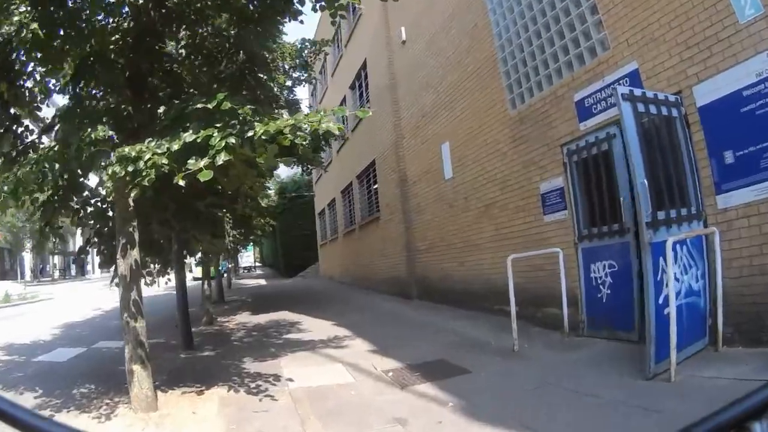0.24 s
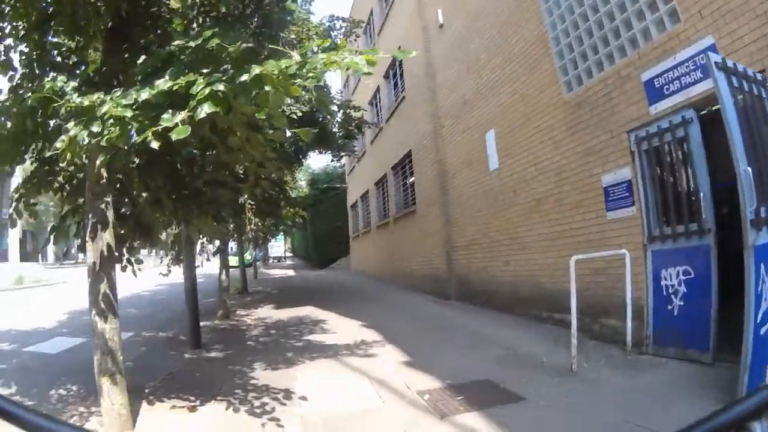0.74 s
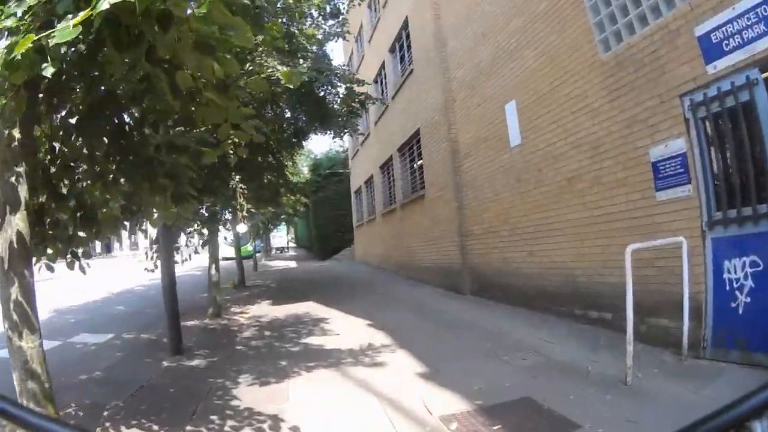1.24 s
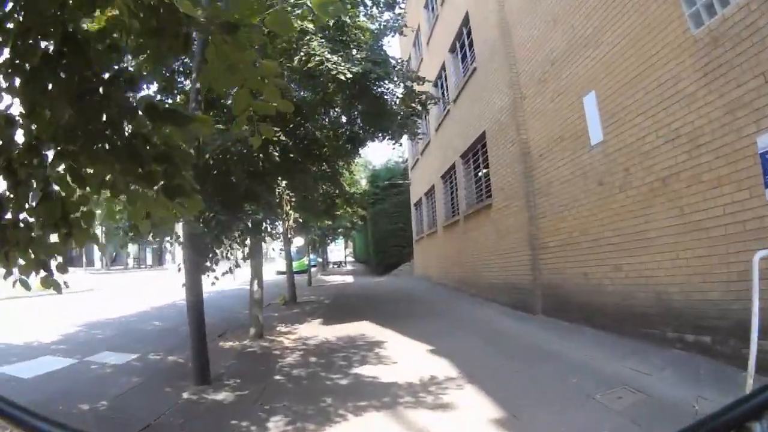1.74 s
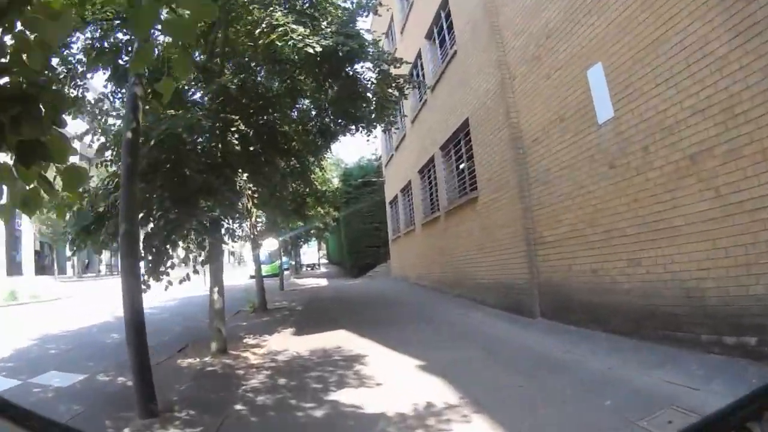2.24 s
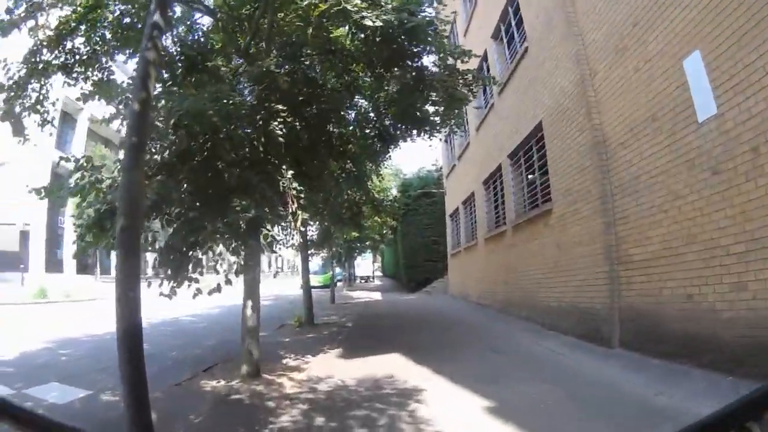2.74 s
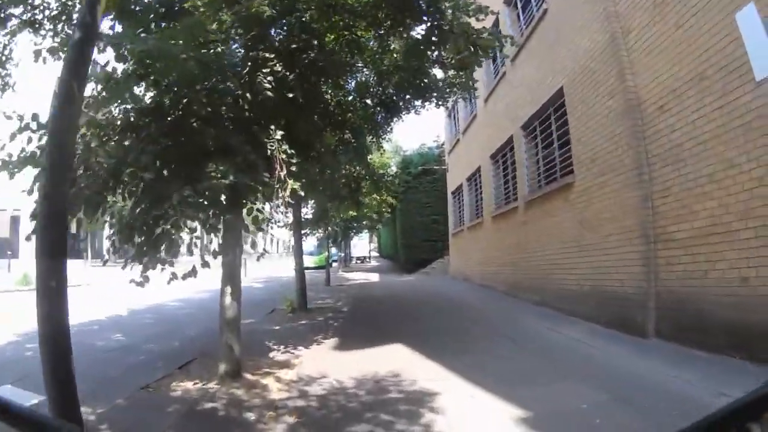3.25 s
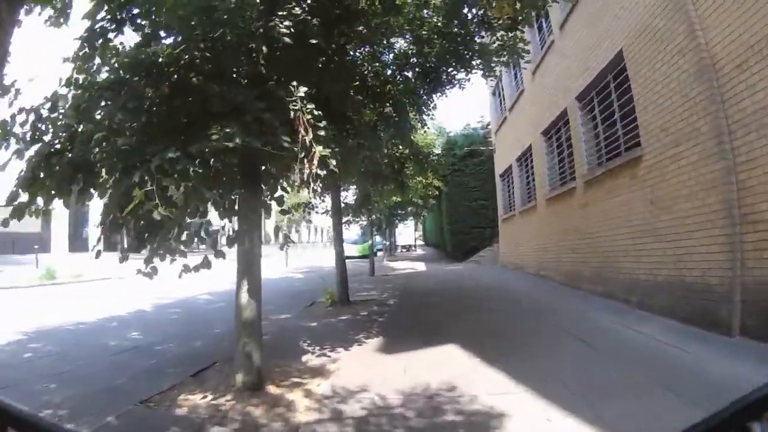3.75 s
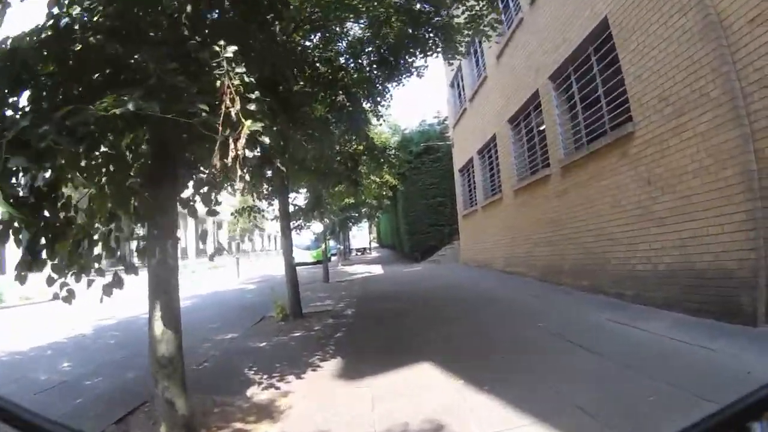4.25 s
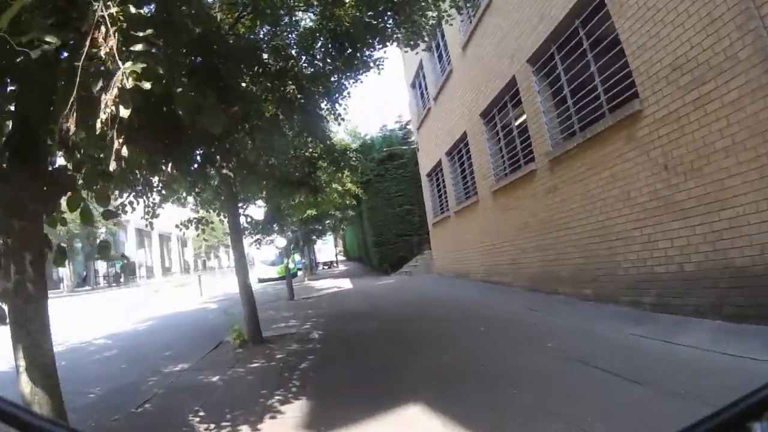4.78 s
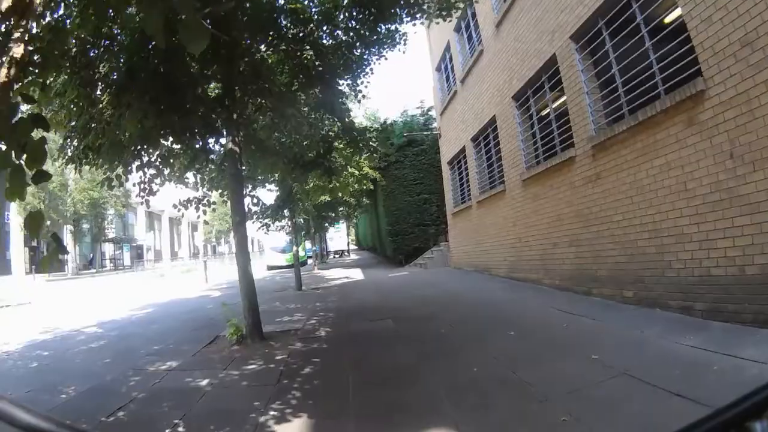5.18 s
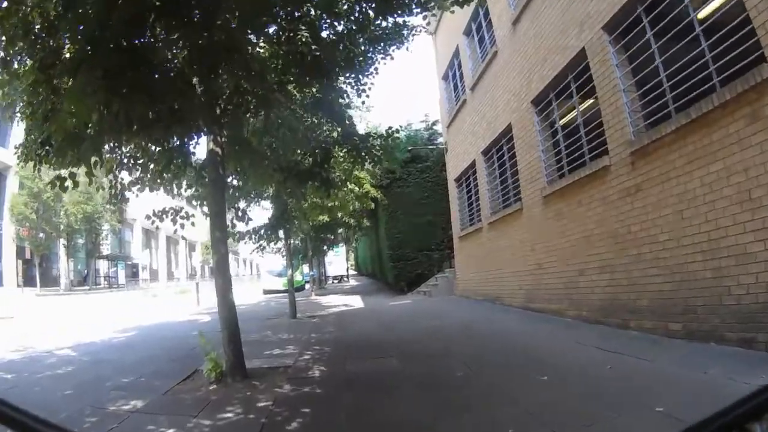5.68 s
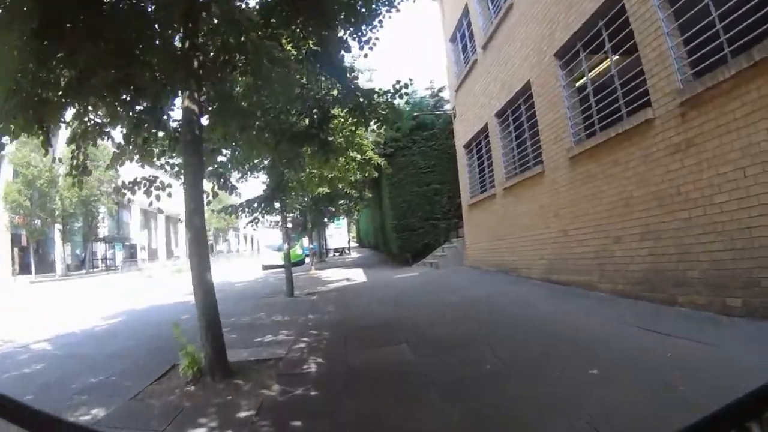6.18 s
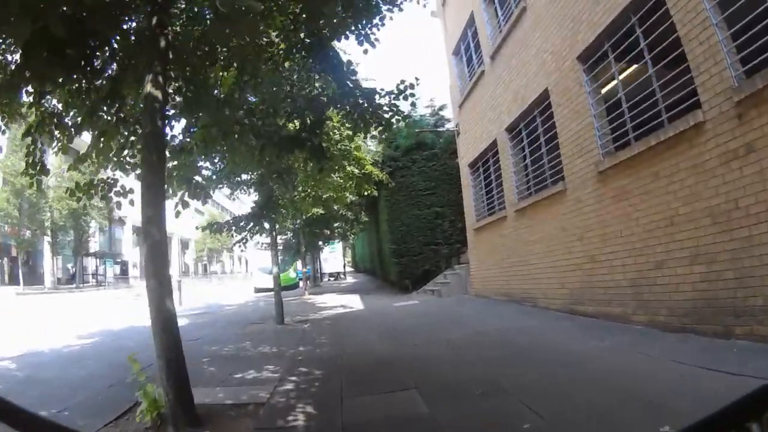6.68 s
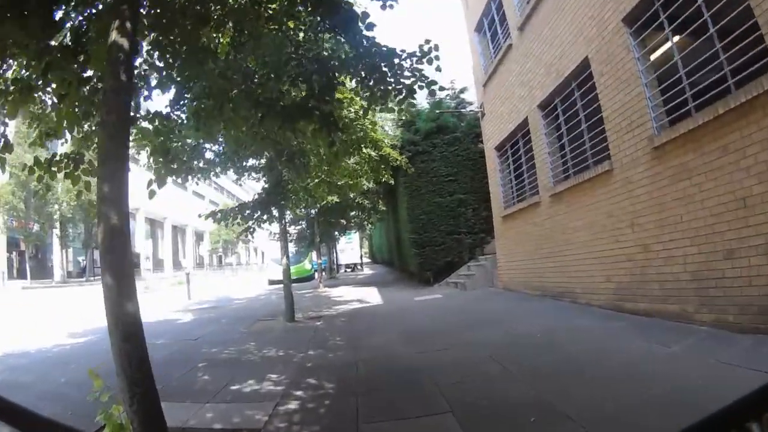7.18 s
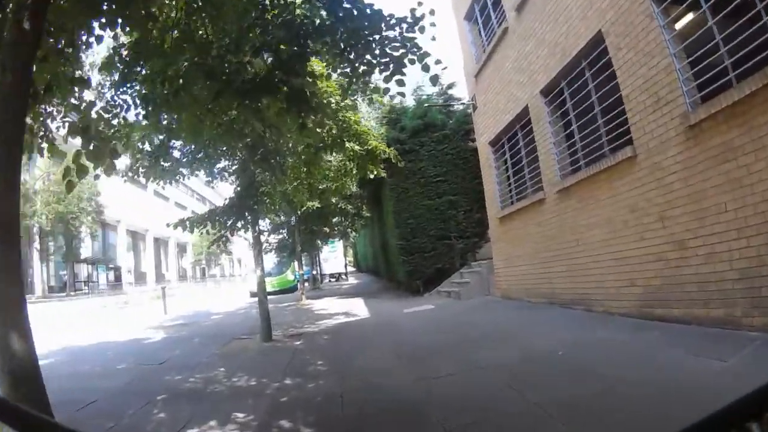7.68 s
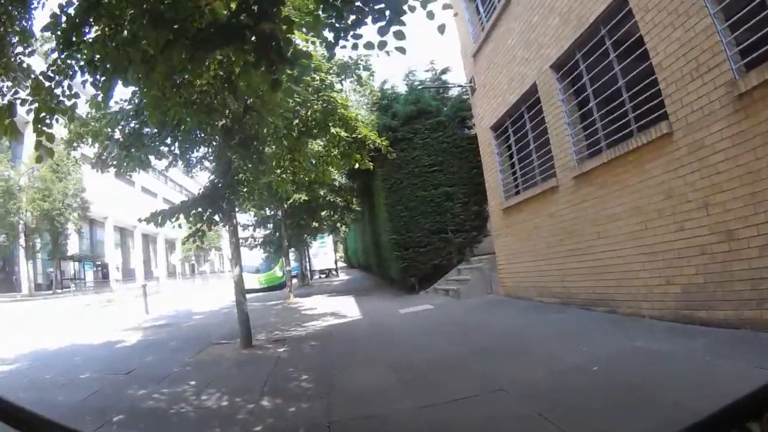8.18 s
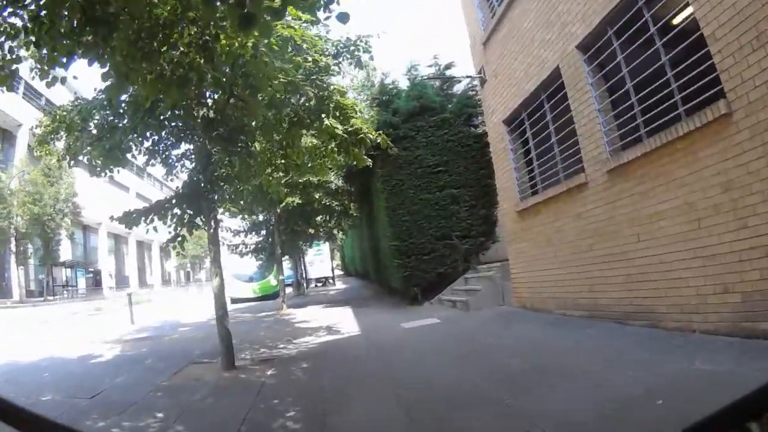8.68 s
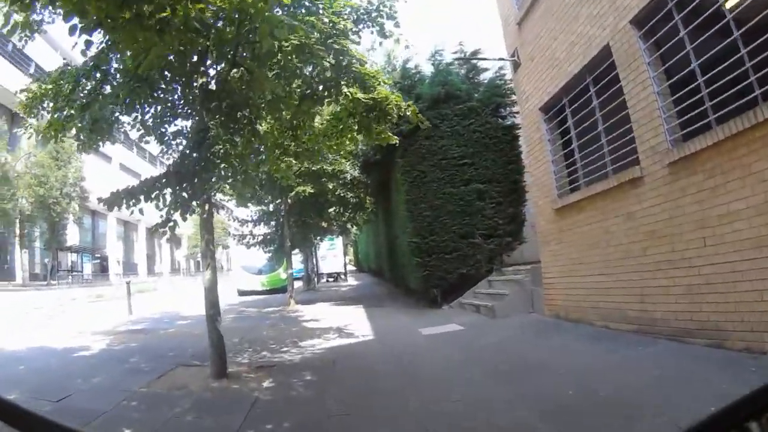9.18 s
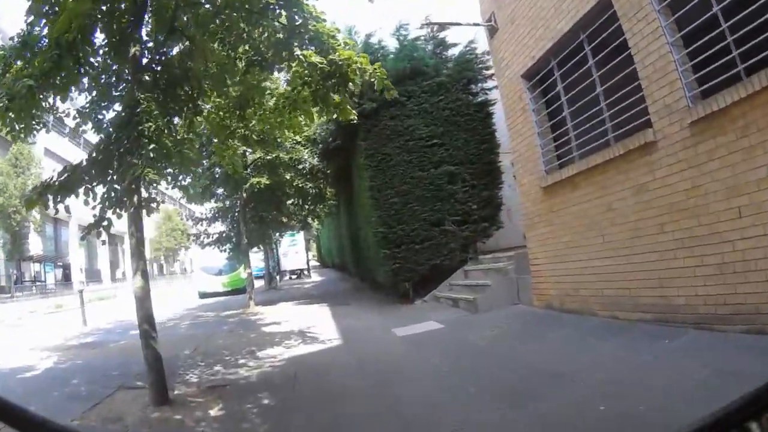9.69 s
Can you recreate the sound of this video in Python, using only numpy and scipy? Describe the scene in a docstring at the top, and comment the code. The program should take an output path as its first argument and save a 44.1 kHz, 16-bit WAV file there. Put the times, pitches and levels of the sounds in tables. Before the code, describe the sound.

A microphone inside a camera housing on a bicycle rides over paving slabs. Throughout, there is a low, uneven tyre rumble, fine loose ticking and a soft distant traffic hiss. Light taps start at once; from 0.57 s hard, hollow plastic knocks crowd together until about 1.5 s, the one near 0.8 s very loud with a deep frame thump. A calmer stretch follows, then another cluster at 2.5-3.0 s, with a barely audible rising whine at 3-3.5 s. Separate clacks fall around 3.8 and 4.1 s. From 5.2 to 6.3 s knocks come thickly, chattering and rasping, with low thumps near 5.5 s and slightly rougher rumble. More strong hits land near 7.3, 7.55, 8.4 and 9.4 s, with fainter taps between. Brief gritty tyre scuffs come at 6.9 and 7.8 s. After 8.3 s a soft low engine hum swells and holds to the end. Everything is close and dry, with very short tails.

```python
"""A camera on a bicycle rolls over paving slabs along a quiet street. From the start: tyre rumble with small
rattles, traffic hiss, and knocks from faint to fairly strong. Slab joints knock the plastic mount, which
chatters, rasps and rings; deep ruts thump the frame. A faint whine rises near 3 s, tyres scuff grit near 6.9
and 7.8 s, and an engine hum swells in after 8.3 s. Knocks are shaped impulses with swarms of contacts; the rest
is filtered noise and sine tones."""
import sys
import numpy as np
from scipy import signal
from scipy.fft import rfft, irfft
from scipy.io import wavfile
from scipy.ndimage import uniform_filter1d

SR = 44100
rng = np.random.default_rng(int(sys.argv[2]) if len(sys.argv) > 2 else 0)


def transcribe(u):
    """Save the signal u as a 16-bit wav file named by the first command-line argument.

    u: samples, shape (n,) or (channels, n), limited to [-1, 1]; the rate is SR.
    q: integer samples, one column per channel.
    """
    v = np.clip(np.atleast_2d(u).T, -1, 1)
    q = np.round(v * 32767).astype(np.int16)
    wavfile.write(sys.argv[1], SR, q)


N = 437913
TIME = np.arange(N) / SR

# Engine hum swelling in: start_s, level_db (rms)
HUM_LEVELS = [(8.3, -59), (8.8, -42.5), (9.9, -42.5)]
# Faint rising whine: start_s, pitch_hz, level_db (rms, before flutter)
WHINE_PATH = [(2.95, 2440, -69), (3.29, 2565, -66), (3.55, 2700, -78)]
# Colour of tyres and street: frequency_hz, level_db (per Hz, relative)
STREET_SPECTRUM = [(22, -11.5), (62, 5.5), (160, 2.5), (260, -5), (580, -3), (780, -12), (1450, -23),
                   (1780, -23.5), (2250, -26.5), (2550, -33.5), (3050, -34.5), (3750, -40), (4700, -41.5),
                   (5400, -44), (7800, -49.5)]
# The ride over changing ground: start_s, rumble_db, traffic_hiss_db (before trims and wavering)
RIDE_LEVELS = [(0, -39, -58.5), (1.25, -38, -61.5), (1.42, -35, -51.5), (1.8, -42, -63), (2.6, -37.5, -58),
               (5.103, -38, -55.5), (5.549, -34, -52.5), (7.101, -37.5, -55.5), (9.901, -36, -56.5)]
# Tyre scuffs on grit: start_s, length_s, level_db (of the rasp), centre_hz
TYRE_SCUFFS = [(6.892, 0.046, -42, 1590), (7.778, 0.095, -39, 940)]
# Thumps of the flexing frame: start_s, level_db (nominal peak)
FRAME_THUMPS = [(0.807, -20), (2.615, -24), (2.943, -18), (4.536, -22), (5.205, -21), (5.491, -14),
                (5.55, -19), (7.628, -21)]
# The housing's answer to one clean blow: frequency_hz, level_db (relative)
BLOW_SPECTRUM = [(25, -32), (60, -18), (200, -0.5), (450, 5.5), (640, 7.5), (850, -5.5), (1150, -6.5),
                 (1450, -20.5), (1750, -25), (2300, -31), (7500, -41.5)]
# The housing when it chatters loosely: frequency_hz, level_db (relative)
CHATTER_SPECTRUM = [(25, -28), (70, -14.5), (200, -3.5), (270, -3.5), (360, 5.5), (470, -4), (630, -1),
                    (900, -13), (1500, -29), (3000, -43), (7500, -71)]
# Thin plastic parts that rasp at each contact: frequency_hz, level_db (relative)
RASP_SPECTRUM = [(500, -14.5), (1200, -15), (1800, 8), (2250, 0.5), (2850, 3.5), (3300, -8), (3900, -8.5),
                 (7500, -13)]
# Ringing of the hollow casing and its metal fittings: pitch_hz (before detuning),
# level_db (relative to the knock, before looseness and chance), t60_s
CASING_RINGS = [(362.6, -15.5, .06), (595, -13, 0.042), (1640, -38.5, 0.041)]
# Knocks at the slab joints: start_s, level_db (nominal peak), chatter_db (relative to the knock, before trim),
# crack_db (extra rasp of the plastic)
JOINT_KNOCKS = [(.57, -6.5, -17, -2.5), (.601, -8.5, -8.5, 4), (0.6404, -15, -15, 13.5),
                (0.7825, 2, -16.5, -3.5), (0.79, -11, -4.5, 2.5), (.817, -6.5, -9, -15),
                (.878, -12, -15, 5), (0.954, -11.5, -19, -11), (0.9851, -8, -24, 8.5),
                (1.161, -17.5, -18, 13.5), (1.2041, -19.5, -10.5, 6), (1.3269, -5, -20, -9),
                (1.3926, -6, -5.5, 3), (1.4345, -0.5, -18.5, 3.5), (1.509, -19, -7.5, 4.5),
                (1.735, -17.5, -6, -1), (2.474, -9.5, -21, 0), (2.622, -8, -24, 5), (2.731, -9.5, -33, 13),
                (2.929, 0.5, -30, -1), (2.9525, -4.5, -8.5, -2), (2.984, -14.5, -9, 8),
                (3.286, -15, -24, 14), (3.601, -15.5, -15, 13.5), (3.81, -1.5, -17.5, -11),
                (4.0775, -6.5, -30, -1), (4.4844, -17.5, -11.5, 4), (5.2177, -5, -8, 1.5),
                (5.2726, -6, -26, -4), (5.3104, -6, -16, 7), (5.4083, -19, -0.5, -5),
                (5.4797, -4.5, -12, -1), (5.5437, -4, -8, 4.5), (5.585, -12.5, -26, 14.5),
                (5.7518, -11, -4.5, -6), (5.773, -13.5, -14.5, 11), (5.873, -13.5, -15.5, 9),
                (6.1147, -1, -31, 0), (6.16, -5.5, -12, 2), (6.178, -10.5, -11, 7), (6.2272, 2, -24, -2),
                (6.2742, -8, -11, 0.5), (6.518, -10, -6.5, 2), (6.811, -10.5, -15, -5),
                (6.8438, -10.5, -10, 2), (6.984, -15, -4, -3), (7.3047, -3, -29.5, 3.5),
                (7.5496, 0, -27, 1), (7.582, -17.5, -4, 7), (7.6966, -4, -14, 0), (7.715, -13, -8.5, 1),
                (8.317, -7, -13, 6.5), (8.4129, -2, -23, -8), (8.4729, -12.5, -13, 3),
                (9.0665, -14, -9, -1), (9.4222, -0.5, -28.5, 5), (9.5795, -15.5, -1.5, 7),
                (9.7813, -5.5, -22.5, 0.5)]
# Further knocks, from faint to fairly strong, with a common chatter, crack and pitch: start_s, level_db
# (nominal peak)
FURTHER_KNOCKS = [(.052, -11.5), (.118, -16), (.353, -15.5), (.552, -16), (.61, -17.5), (.849, -14.5),
                  (1.1292, -11), (1.384, -15), (1.452, -17), (1.773, -12), (1.795, -19), (1.9, -20),
                  (2.301, -19.5), (2.519, -15), (2.547, -17), (2.609, -13.5), (2.665, -15.5), (2.758, -15),
                  (2.824, -18.5), (2.86, -16), (3.013, -17), (3.047, -16.5), (3.0633, -13.5), (3.223, -10),
                  (3.2727, -13.5), (3.443, -21), (3.469, -20.5), (3.783, -19.5), (3.835, -12), (3.845, -9.5),
                  (4.051, -15), (4.3842, -12.5), (4.416, -16.5), (5.0223, -15), (5.2, -14), (5.332, -18),
                  (5.496, -11), (5.529, -12), (5.605, -20.5), (5.6843, -10), (5.952, -19), (6.025, -18.5),
                  (6.09, -12), (6.102, -8.5), (6.15, -16), (6.414, -17.5), (6.455, -19), (6.623, -16),
                  (6.873, -15.5), (6.962, -20.5), (7.384, -17.5), (7.492, -21), (7.888, -18), (7.961, -18),
                  (8.02, -17), (8.096, -17), (8.448, -18), (8.6825, -10.5), (8.757, -20), (8.791, -14),
                  (8.958, -17.5), (9.169, -17.5), (9.485, -18.5), (9.566, -16.5), (9.699, -18), (9.752, -15),
                  (9.829, -14), (9.847, -17.5)]

# a firm joint knock rings higher than a loose one; a louder one rings slightly lower
BASE_HZ, FALL_HZ_PER_CHATTER_DB, FALL_HZ_PER_LEVEL_DB = 453, 6.5, 1
# harder blows are brighter: treble dB gained per dB of level, above a corner
TREBLE_DB_PER_DB, TREBLE_HZ = 0.82, 1170
# the further knocks share one middling chatter, crack and nominal pitch
COMMON_CHATTER_DB, COMMON_CRACK_DB, COMMON_HZ = -14.5, 3, 575
EDGE_HZ = 8250  # upper band limit of the microphone's input


def gain_of(db):
    """Decibels to amplitude."""
    return 10 ** (np.asarray(db) / 20)


def evened(x):
    """Scales a sound to rms 1."""
    return x / np.sqrt(np.mean(x ** 2) + 1e-20)


def read_spectrum(points, hz):
    """A spectrum's dB, joined on a log-frequency axis."""
    f, db = np.transpose(points)
    return np.interp(np.log(hz + 1), np.log(f + 1), db)


def add(mix, start_s, sound):
    """Mixes a sound in at its start time."""
    part = mix[max(round(start_s * SR), 0):][:len(sound)]
    part += sound[:len(part)]


def decay(t, t60):
    """Exponential fade that falls 60 dB in t60 seconds."""
    return np.exp(-np.log(1000) * t / t60)


def body_response(points, stretch=1, treble_db=0, size=2048):
    """Minimum-phase answer of a body with this spectrum, peak 1; stretch raises its pitch."""
    hz = abs(np.fft.fftfreq(size, 1 / SR))
    treble_shelf = treble_db / (1 + (TREBLE_HZ / (hz + 1)) ** 4)
    log_gain = np.log(gain_of(read_spectrum(points, hz / stretch) + treble_shelf))
    # the Hilbert transform gives the phase that puts the energy right at the strike
    wave = np.fft.ifft(np.exp(signal.hilbert(log_gain).conj())).real[:size // 2]
    return wave / abs(wave).max()


def drift(hz):
    """Slow random wandering of rms 1, holding only frequencies below hz."""
    spectrum = rfft(rng.standard_normal(N))
    return evened(irfft(spectrum * (np.fft.rfftfreq(N, 1 / SR) < hz), N))


def band(x, low_hz, high_hz):
    """Butterworth band-pass."""
    return signal.sosfilt(signal.butter(2, [low_hz, high_hz], "band", fs=SR, output="sos"), x)


def patchy(x, db=2.0, width_hz=260, length_s=.09):
    """Lets a hiss drift in soft patches of pitch and time, at rms 1."""
    hz, s, z = signal.stft(x, SR, nperseg=1024)
    field = uniform_filter1d(rng.standard_normal(z.shape), int(width_hz / hz[1]) + 1, axis=0)
    field = uniform_filter1d(field, int(length_s / s[1]) + 1, axis=1)
    _, patched = signal.istft(z * gain_of(db * evened(field)), SR, nperseg=1024)
    return evened(patched[:N])


def engine_hum(hum_hz=140, waver=0.02):
    """An engine hums down the street: a sine whose pitch wanders slowly."""
    level = gain_of(np.interp(TIME, *np.transpose(HUM_LEVELS), left=-np.inf))
    turns = np.cumsum(hum_hz * (1 + waver * drift(3.0))) / SR
    return np.sqrt(2) * level * np.sin(2 * np.pi * turns)


def whine(flutter=.35, wobble_hz=24):
    """A brief rising sine, uneven in both level and pitch."""
    s, hz, db = np.transpose(WHINE_PATH)
    level = gain_of(np.interp(TIME, s, db, left=-np.inf, right=-np.inf)) * (1 + flutter * drift(42))
    turns = np.cumsum(np.interp(TIME, s, hz) + wobble_hz * drift(25)) / SR
    return np.sqrt(2) * level * np.sin(2 * np.pi * turns)


def rattle(calm_per_s=22, shaken_per_s=55, shaken_s=0.1, spread_db=3.5, length_s=0.0024, rasp_db=-22):
    """The mount ticks now and then, busily after each joint; each tick is a tiny cluster of contacts."""
    since_joint = np.min([np.where(TIME > s, TIME - s, np.inf) for s, *_ in JOINT_KNOCKS], axis=0)
    per_s = calm_per_s + shaken_per_s * np.exp(-since_joint / shaken_s)
    strength = gain_of(spread_db * np.minimum(rng.exponential(1, N), 2))
    ticks = (rng.random(N) < per_s / SR) * strength
    clusters = signal.oaconvolve(ticks, signal.windows.hann(int(length_s * SR)))[:N]
    contacts = clusters * rng.standard_normal(N)
    body = evened(signal.oaconvolve(contacts, body_response(CHATTER_SPECTRUM))[:N])
    rasp = evened(signal.oaconvolve(contacts, body_response(RASP_SPECTRUM))[:N])
    return body + gain_of(rasp_db) * rasp


def rolling(rumble_db=0.5, hiss_db=0, rattle_db=-3.0, lumpy_db=2.0, hiss_waver_db=2.0):
    """Tyre rumble and rattle follow the roughness of the ground; street hiss lies behind them."""
    s, ground_db, traffic_db = np.transpose(RIDE_LEVELS)
    hz = np.fft.rfftfreq(N, 1 / SR)
    street = rfft(rng.standard_normal(N)) * gain_of(read_spectrum(STREET_SPECTRUM, hz))
    far = 1 / (1 + (1200 / (hz + 1)) ** 4)  # the treble is mostly distant traffic
    hiss_level = gain_of(np.interp(TIME, s, traffic_db) + hiss_db + hiss_waver_db * drift(42))
    traffic = hiss_level * patchy(irfft(street * far, N))
    rumble = gain_of(rumble_db + lumpy_db * drift(25)) * evened(irfft(street * (1 - far), N))
    near = rumble + gain_of(rattle_db) * rattle()
    return gain_of(np.interp(TIME, s, ground_db)) * near + traffic


def scuffs(fizz_db=-22, grains_per_s=2400):
    """Rubber drags over grit: dense grains rasp an octave either side of the centre, with a little fizz."""
    out = np.zeros(N)
    for start_s, length_s, db, hz in TYRE_SCUFFS:
        count = int(length_s * SR)
        grit = rng.standard_normal(count) * (rng.random(count) < grains_per_s / SR)
        rasp = evened(band(band(grit, hz / 2, hz * 2), hz / 2, hz * 2))
        fizz = evened(band(rng.standard_normal(count), 2500, 5500))
        scuff = (rasp + gain_of(fizz_db) * fizz) * signal.windows.tukey(count, .5)
        add(out, start_s, gain_of(db) * scuff)
    return out


def thumps(hz=85, t60=0.037):
    """The frame flexes for a few slow cycles: a low sine that dies away fast."""
    out, t = np.zeros(N), np.arange(SR // 10) / SR
    for start_s, db in FRAME_THUMPS:
        add(out, start_s, 2 * gain_of(db) * np.sin(2 * np.pi * hz * t) * decay(t, t60))
    return out


def spray(blows, db=-31, settle_s=0.01, contacts_per_s=700, low_hz=2450, high_hz=3600):
    """After a knock the small parts buzz on, most when loose: a rough, bright spray that thins out."""
    envelope, t = np.zeros(N), np.arange(SR // 4) / SR
    for start_s, knock_db, loose_db, *_ in blows:
        add(envelope, start_s, gain_of(knock_db + loose_db + db) * np.exp(-t / settle_s))
    contacts = evened(rng.standard_normal(N) * (rng.random(N) < contacts_per_s / SR))
    return band(envelope * contacts, low_hz, high_hz) / band(contacts, low_hz, high_hz).std()


def pings(blows, detune=0.045, spread_db=2.0, db_per_chatter_db=0.45):
    """Each knock sets casing and fittings ringing, in a new mix each time; loose knocks ring most."""
    out, t = np.zeros(N), np.arange(SR // 16) / SR
    for start_s, knock_db, loose_db, *_ in blows:
        for ring_hz, ring_db, t60 in CASING_RINGS:
            hz = ring_hz * (1 + detune * rng.standard_normal())
            db = knock_db + db_per_chatter_db * loose_db + ring_db + spread_db * rng.standard_normal()
            add(out, start_s, -gain_of(db) * np.sin(2 * np.pi * hz * t) * decay(t, t60))
    return out


def further_knocks():
    """Further knocks, differing in level only: start_s, level_db, chatter_db, crack_db, pitch_hz."""
    return [(s, db, COMMON_CHATTER_DB, COMMON_CRACK_DB, COMMON_HZ) for s, db in FURTHER_KNOCKS]


def joint_knocks():
    """Joint knocks, pitched by firmness and level: start_s, level_db, chatter_db, crack_db, pitch_hz."""
    rows = []
    for s, db, loose_db, crack_db in JOINT_KNOCKS:
        hz = BASE_HZ - FALL_HZ_PER_CHATTER_DB * loose_db - FALL_HZ_PER_LEVEL_DB * db
        rows.append((s, db, loose_db, crack_db, hz))
    return rows


def knocks(blows, housing_hz=560, pitch_spread=0.064, blow_db=-1,
           lead_s=.009, rise_s=0.0038, settle_s=0.007, press_s=0.00072, contacts_per_s=850, chatter_db=-10,
           rasp_db=-3.0, rasp_rise_s=.0006, colour=0.014, swarm_rasp_db=-4):
    """One hard blow inside a swarm of small contacts that starts just before it and dies away."""
    out, t = np.zeros(N), np.arange(SR // 16) / SR
    swarm = np.exp(np.minimum((t - lead_s) / rise_s, (lead_s - t) / settle_s))
    swarm *= 1 - np.exp(-((t - lead_s) / press_s) ** 2)  # the parts are pressed together during the blow
    # surfaces slide as they meet
    scrape = t / rasp_rise_s * np.exp(-t / rasp_rise_s) + np.exp(-t / press_s) / 2
    for start_s, db, loose_db, crack_db, usual_hz in blows:
        hz = usual_hz * (1 + pitch_spread * rng.uniform(-1, 1))  # each blow lands on another spot
        treble_db = TREBLE_DB_PER_DB * db
        blow = body_response(BLOW_SPECTRUM, hz / housing_hz, treble_db)
        add(out, start_s, -gain_of(db + blow_db) * blow)

        contacts = swarm * rng.standard_normal(len(t)) * (rng.random(len(t)) < contacts_per_s / SR)
        chatter = signal.fftconvolve(contacts, body_response(CHATTER_SPECTRUM, np.sqrt(hz / housing_hz)))
        force = gain_of(loose_db + chatter_db) / chatter.std()
        add(out, start_s - lead_s, gain_of(db) * force * chatter)

        # the blow and every later contact shake short-lived high modes, a new mix for each knock
        touches = gain_of(swarm_rasp_db) * force * contacts * (t > lead_s)
        add(touches, lead_s, gain_of([treble_db]) / 2)
        plastic = body_response(RASP_SPECTRUM, 1 + colour * rng.uniform(-1, 1))
        modes = signal.fftconvolve(rng.standard_normal(len(t)) * scrape, plastic)
        modes *= gain_of(db + rasp_db + crack_db) / np.linalg.norm(modes)
        add(out, start_s - lead_s - rasp_rise_s, signal.fftconvolve(touches, modes))
    return out


def shudder(x, db=-22, t60=0.21):
    """The frame and the nearby wall carry each knock on for a moment: a short decaying noise tail."""
    t = np.arange(SR // 2) / SR
    tail = rng.standard_normal(len(t)) * decay(t, t60) * np.minimum(t / 0.011, 1)
    return x + gain_of(db) * signal.oaconvolve(x, tail / np.linalg.norm(tail))[:N]


def scene():
    """Everything reaches the one microphone in the housing."""
    blows = joint_knocks() + further_knocks()
    street = engine_hum() + whine() + rolling() + scuffs()
    mount = spray(blows) + shudder(knocks(blows) + pings(blows))
    return (street + thumps() + mount)[None]


def record(dry):
    """The hardest knocks overload the input and clip flat; then a low-pass limits the band."""
    clipped = np.clip(dry, -.96, .96)
    low_pass = signal.firwin(161, EDGE_HZ, window=("kaiser", 8), fs=SR)
    return signal.oaconvolve(clipped, low_pass[None], "same")


dry = scene()
out = record(dry)
transcribe(out)
```